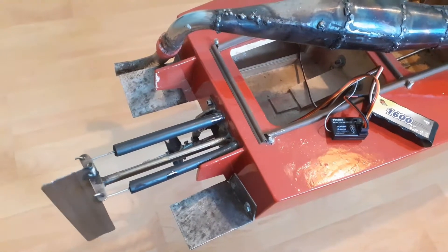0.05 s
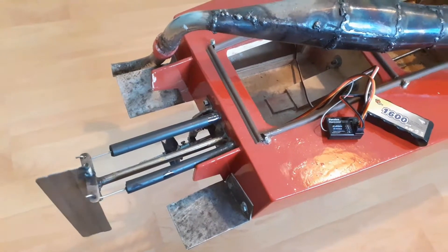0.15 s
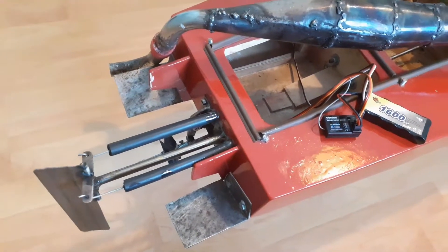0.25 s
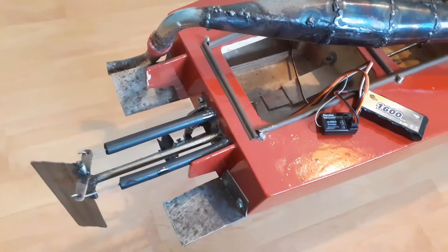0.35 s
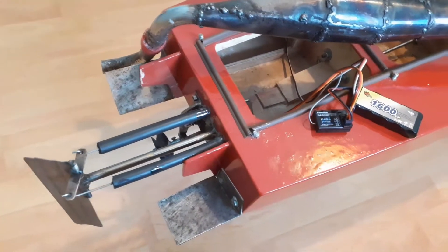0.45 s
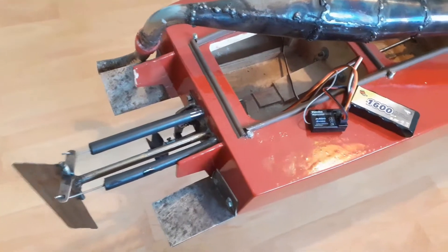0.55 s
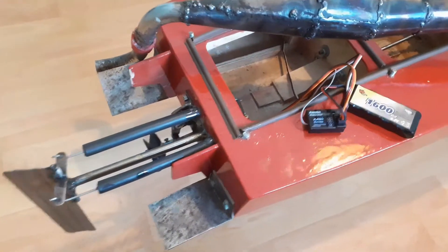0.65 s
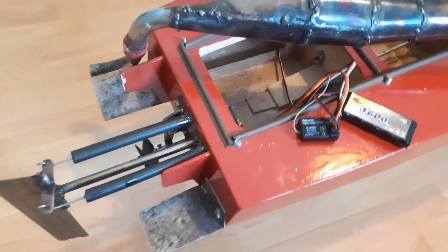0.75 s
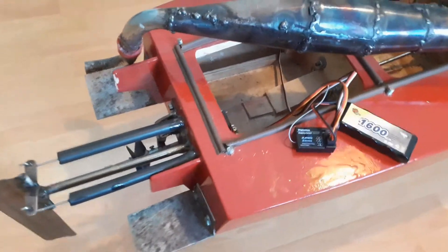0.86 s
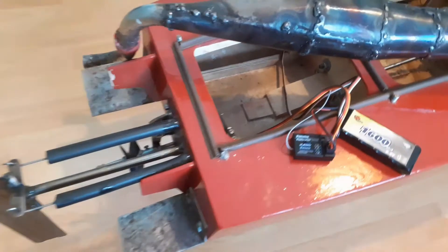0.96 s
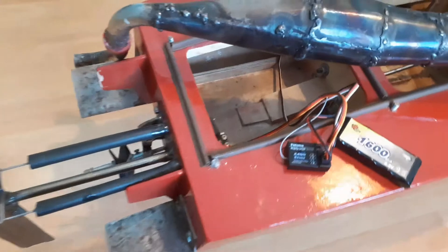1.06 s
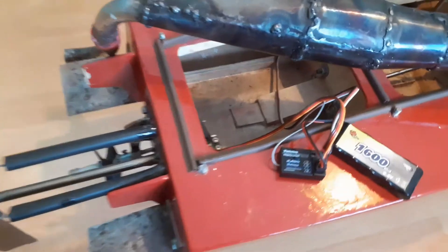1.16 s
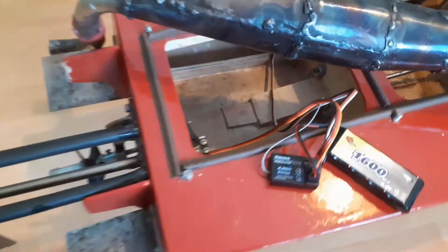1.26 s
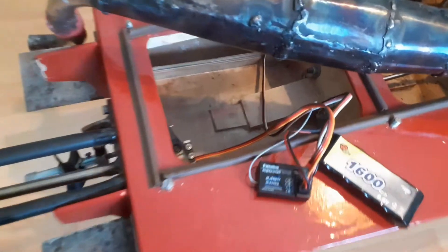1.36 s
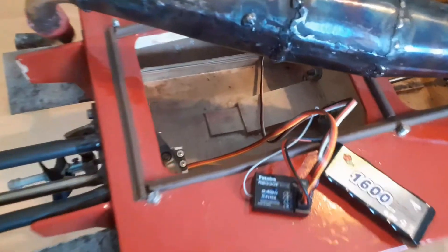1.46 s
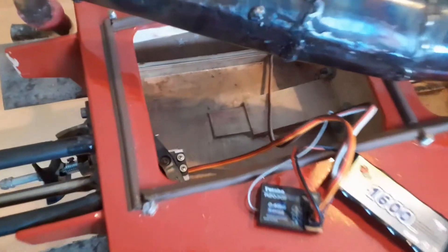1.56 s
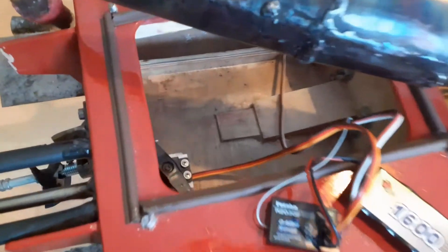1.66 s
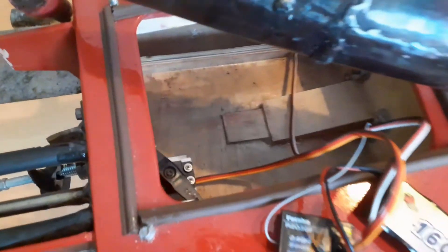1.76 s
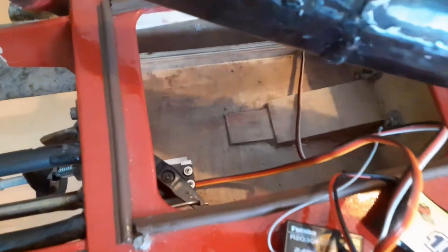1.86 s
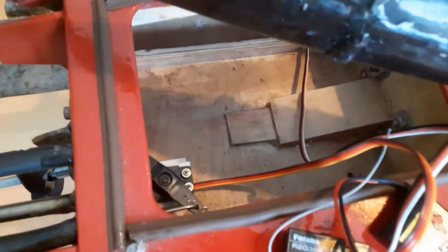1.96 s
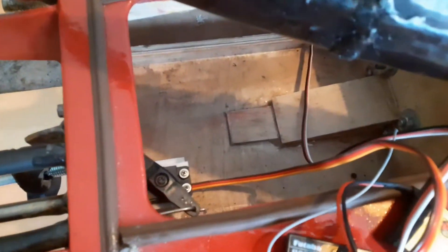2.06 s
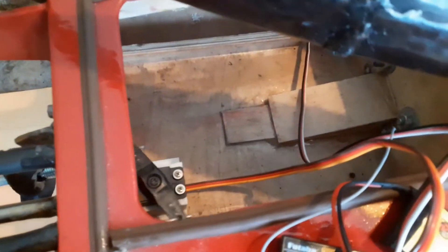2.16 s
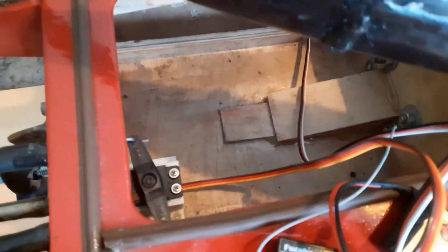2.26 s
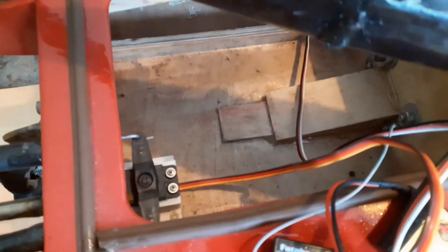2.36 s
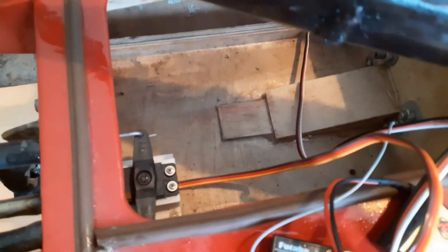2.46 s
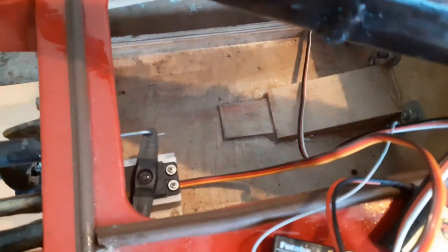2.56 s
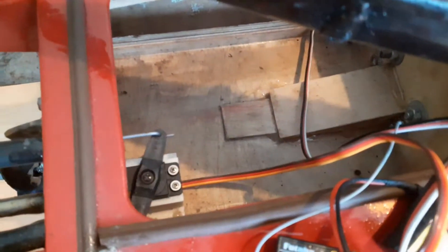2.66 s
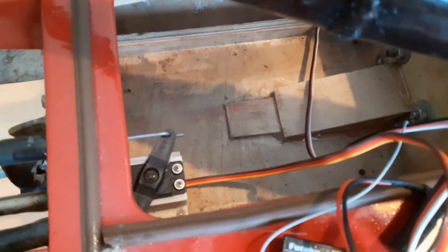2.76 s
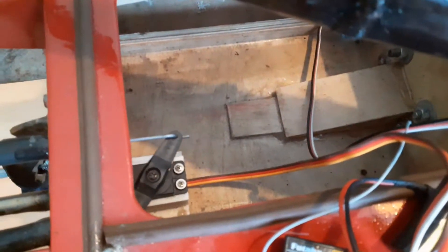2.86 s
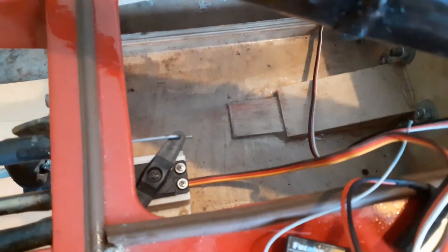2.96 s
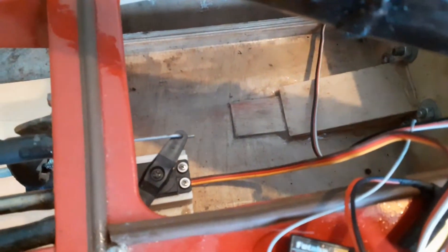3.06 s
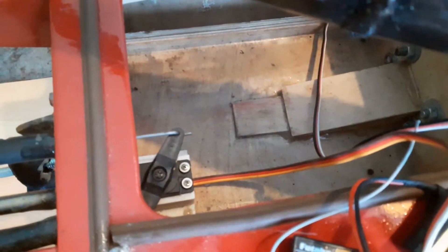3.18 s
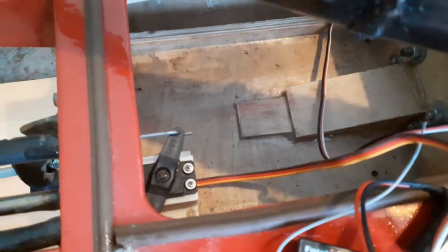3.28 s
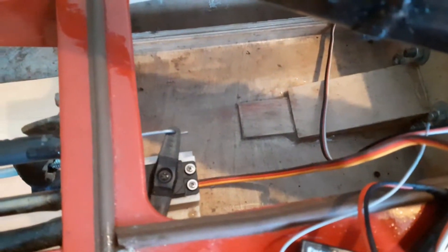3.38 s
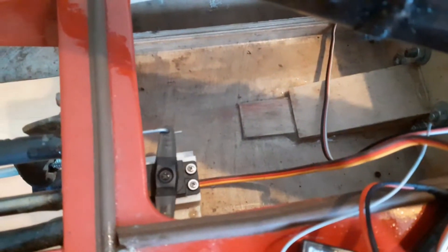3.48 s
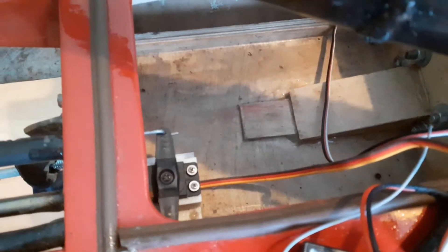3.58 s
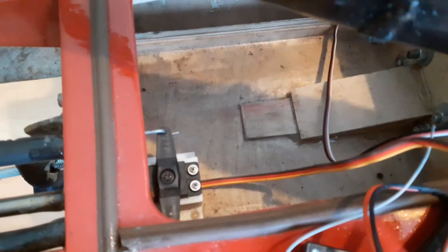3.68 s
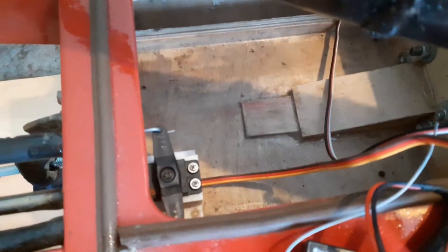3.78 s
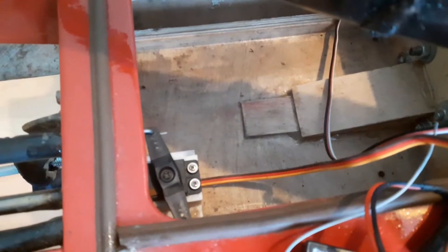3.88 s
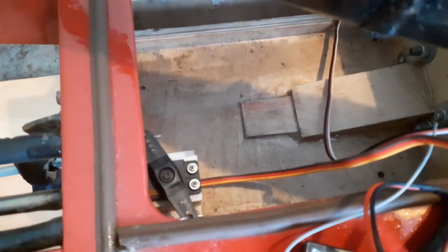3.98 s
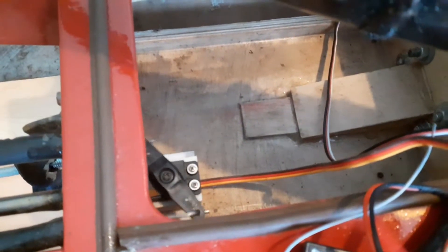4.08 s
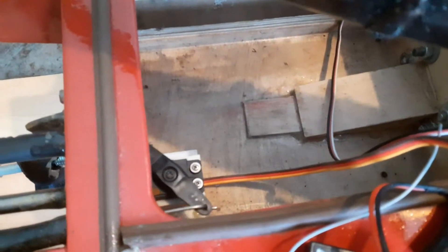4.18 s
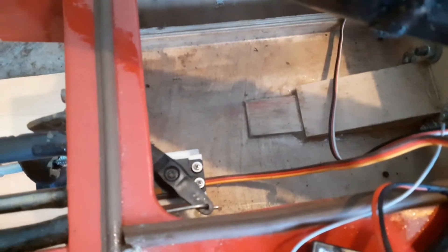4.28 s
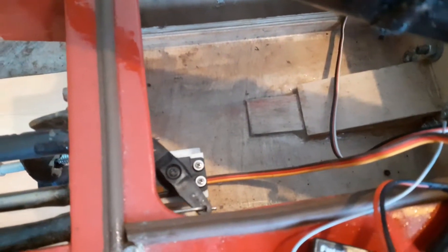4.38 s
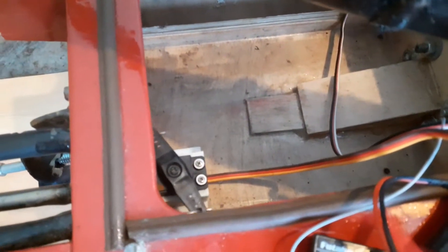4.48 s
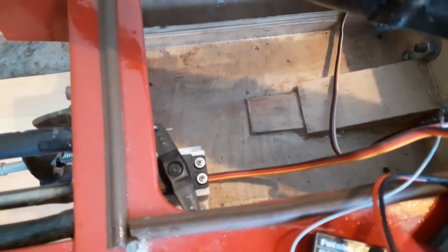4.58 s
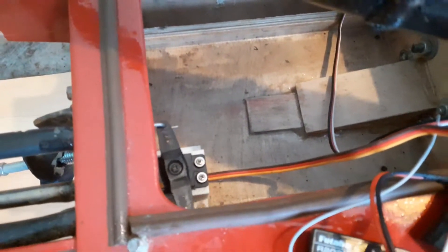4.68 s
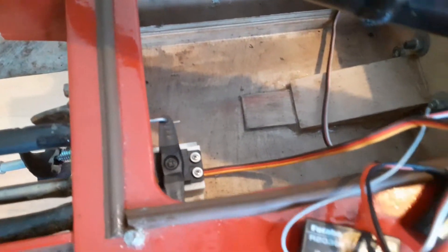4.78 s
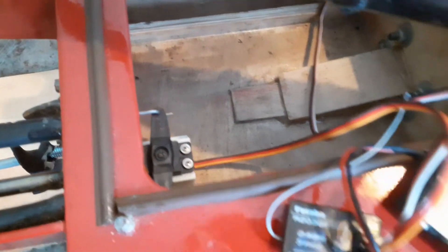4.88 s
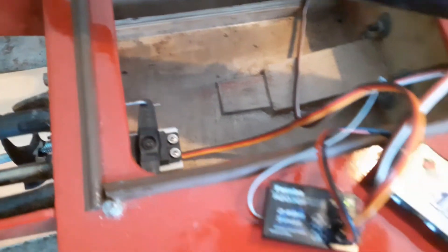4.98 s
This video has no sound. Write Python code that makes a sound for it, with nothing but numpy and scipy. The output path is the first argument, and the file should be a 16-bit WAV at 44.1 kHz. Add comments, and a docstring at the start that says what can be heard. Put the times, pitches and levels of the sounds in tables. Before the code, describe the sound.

Close stereo microphone over an open model hull indoors: a tiny geared motor buzzes, stops and buzzes again as it swings a push rod. It begins mid-whir, drops to weak, uneven bursts, then strengthens into sustained raspy strokes. High fizzing tooth clatter rides over papery panel rattle and faint hollow boom, with light ticks at starts, quick decay and barely audible still air.

```python
"""Model boat rudder servo

A small servo swings the rudder to and fro on an indoor workbench, heard from close by.
Gear slack closes with a tick at most stroke starts; loose teeth, as random impacts, clatter and ring
the servo case, push rod, hull panels and hollow hull. The linkage jolts the hull with soft knocks.
A small room lets every stroke die away quickly over faint still air."""
import sys
import numpy as np
from scipy import signal
from scipy.fft import rfft, irfft
from scipy.io import wavfile
from scipy.ndimage import uniform_filter1d, map_coordinates

SR = 44100
rng = np.random.default_rng(int(sys.argv[2]) if len(sys.argv) > 2 else 0)


def transcribe(u):
    """Save the signal u as a 16-bit wav file named by the first command-line argument.

    u: samples, shape (n,) or (channels, n), limited to [-1, 1]; the rate is SR.
    q: integer samples, one column per channel.
    """
    v = np.clip(np.atleast_2d(u).T, -1, 1)
    q = np.round(v * 32767).astype(np.int16)
    wavfile.write(sys.argv[1], SR, q)


N = 222040
T = np.arange(N) / SR

# listener leaning in over the open hull: t/s, left minus right/dB, case ring/dB
LISTENER = [(0, 2.5, -5), (.6, 3, -2), (1.05, 1.5, 1.5), (1.9, 2.5, 0.5), (2.65, 4, .5), (3.05, 2, 2.5),
            (3.5, 2.5, 0.5), (5.03, 2.5, 1)]
# hollow hull modes: f/Hz, width/Hz, level/dB, left minus right/dB
HULL_MODES = [(147.6, 30, -19.5, 4), (239.5, 20, -13.5, -2), (332, 16.3, -0.5, 0.5), (362, 26.5, -5, -1),
              (452.4, 27, -6, 2), (530, 48, -12, 11)]
# tooth click spectrum: f/Hz, relative density/dB
CLICK_SPECTRUM = [(2800, -28), (3500, -36.5), (4000, -6.5), (4600, -2), (6000, 0), (7300, 2.5), (8400, 0),
                  (9700, 0.5), (11500, 1.5), (13000, -2.5), (15800, -9)]


def undb(db):
    """Decibels to gain."""
    return 10 ** (np.asarray(db) / 20)


def unit(x):
    """Scale to rms 1."""
    return x / np.sqrt(np.mean(x ** 2))


def pan(db):
    """Left and right gains for a level difference, left minus right."""
    return undb(np.array([[.5], [-.5]]) * db)


def walk(rate_per_s):
    """Random levels, each held 1 / rate, smoothed by a moving mean as long; rms 1."""
    hold = max(int(SR / rate_per_s), 2)
    steps = np.repeat(rng.standard_normal(N // hold + 1), hold)
    return unit(uniform_filter1d(steps, hold)[:N])


def colour(x, points):
    """Minimum-phase filter through (f/Hz, level/dB) points, from the cepstrum of its log gain."""
    hz, db = np.transpose(points)
    size = 4096
    f = np.maximum(np.fft.rfftfreq(size, 1 / SR), 1)
    gain = undb(np.interp(np.log(f), np.log(hz), db))
    cepstrum = irfft(np.log(gain))
    # fold onto positive time: causal
    cepstrum[1:size // 2] *= 2
    cepstrum[size // 2 + 1:] = 0
    response = irfft(np.exp(rfft(cepstrum)))
    return signal.fftconvolve(x, response[None], axes=1)[:, :N]


def ring(x, hz, width_hz):
    """One resonance, gain 1 at its centre."""
    return signal.lfilter(*signal.iirpeak(hz, hz / width_hz, fs=SR), x + 1e-18)  # offset: no denormals


def impacts(rate_per_s, scatter_db):
    """Irregular tooth impacts, on either flank and of uneven strength; mean power 1."""
    hit = rng.random(N) < rate_per_s / SR
    flank = rng.choice([-1, 1], N)
    size = unit(undb(scatter_db * rng.standard_normal(N)))
    return hit * flank * size * np.sqrt(SR / rate_per_s)


def body(modes, rate_per_s, scatter_db, flicker_db, flicker_per_s):
    """Impacts ring a set of modes; the contact point wanders, so each mode swells and fades alone."""
    out = 0
    for hz, width_hz, db, side_db in modes:
        tone = ring(impacts(rate_per_s, scatter_db), hz, width_hz)
        tone = ring(tone, hz, min(5 * width_hz, hz))  # trims the skirts
        flickering = unit(tone * undb(flicker_db * walk(flicker_per_s)))
        out = out + flickering * undb(db) * pan(side_db)
    return unit(out)


def hull_echoes(x, spread, longest_s, count):
    """Reflections off the hull walls, others for each ear; their comb shifts as the listener moves."""
    # echo path: t/s, relative length
    echo_path = [(0, 1.18), (1.2, 1.15), (2.2, 1.0), (5.03, 1.093)]
    path = np.interp(T, *np.transpose(echo_path))
    high_pass = signal.butter(2, 450, "high", fs=SR, output="sos")
    short_waves = signal.sosfilt(high_pass, x)  # long waves bend round the walls
    out = np.array([x, x])
    for ear in out:
        for lag_s in rng.uniform(0.09995, 1, count) * longest_s:
            late = map_coordinates(short_waves, [np.arange(N) - lag_s * path * SR], order=3)
            ear += spread * rng.choice([-1, 1]) * late / np.sqrt(count)
    return out


def clatter(points, rate_per_s, scatter_db, spread, longest_s):
    """Dry tooth clicks with their echoes inside the hull."""
    echoed = hull_echoes(impacts(rate_per_s, scatter_db), spread, longest_s, count=7)
    return unit(colour(echoed, points))


def drive():
    """Gear, hull, panel and grit gains: the motor spins up, wavers, swells, dips and coasts to rest."""
    # motor effort, one curve per rudder stroke: t/s, gear level/dB
    effort = [
        [(0.0, -41.5), (0.138, -32), (0.252, -41), (0.27, -37), (0.446, -43), (0.458, -41), (0.492, -48),
         (0.508, -44.5), (0.53, -48)],
        [(0.62, -52.5), (0.632, -45), (0.674, -40.5), (0.712, -45.5), (0.81, -48.5), (0.832, -55.5),
         (0.856, -46), (0.932, -62.5), (0.97, -59)],
        [(1.0, -55), (1.016, -47), (1.044, -42), (1.068, -47), (1.09, -46), (1.125, -53)],
        [(1.23, -57.5), (1.238, -50.5), (1.284, -47.5), (1.298, -54), (1.338, -51.5), (1.354, -43),
         (1.464, -51.5), (1.498, -45.5), (1.55, -58)],
        [(1.58, -52), (1.602, -58), (1.716, -43.5), (1.752, -52.5), (1.77, -40.5), (1.862, -42.5), (1.872, -37),
         (1.962, -38.5), (1.97, -42.5)],
        [(2.212, -42), (2.236, -35), (2.34, -31), (2.502, -33.5), (2.52, -44.5)],
        [(2.535, -42), (2.603, -37), (2.609, -31.5), (2.843, -34.5), (2.855, -41), (2.877, -32), (2.995, -40),
         (3.013, -31.5), (3.025, -42.5)],
        [(3.218, -41), (3.23, -34), (3.376, -45.5), (3.384, -40), (3.434, -40.5), (3.448, -34.5), (3.602, -34),
         (3.62, -29), (3.635, -36.5)],
        [(3.825, -45.5), (3.841, -40), (3.889, -39), (3.915, -31.5), (3.947, -37), (4.157, -36.5), (4.173, -30),
         (4.253, -32.5), (4.265, -40)],
        [(4.42, -45), (4.432, -40.5), (4.694, -33.5), (4.726, -39.5), (4.776, -32.5), (4.858, -32),
         (4.878, -44), (4.924, -40), (5.02, -56)],
    ]
    # load per stroke: gear/dB, then relative to gear: hull boom/dB, panel rattle/dB, grit/dB
    loads = [(3, -19, -10, -6.5), (3, -15, -8.5, -6), (1.5, -18, -9.5, -9.5), (2, -16, -10, -8),
             (2.5, -13.5, -11, -8.5), (3, -15, -11.5, -7.5), (1.5, -14.5, -13, -12),
             (2.5, -14.5, -10.5, -9.5), (2.5, -16.5, -10, -9), (2, -14.5, -11.5, -9.5)]
    # brief swells and dips of the whir: t/s, gain/dB
    swells = [(.31, 2), (0.334, -2.5), (0.366, 5.5), (1.92, -3), (1.95, 1.5), (2.436, 1), (2.74, 6),
              (2.795, -1.5), (3.55, 2.5), (4.01, 1), (4.07, 3), (4.107, -3.5), (4.127, 3.5), (4.564, 3.5),
              (4.607, -3.5)]
    usual_db = -38  # ordinary effort
    growth = np.array([[1], [0.71], [1], [1.38]])  # dB per dB of effort: hard driving sounds brighter
    swell_s = 0.0086  # 1/e half length
    lead_s, spin_up_s, coast_s = 0.0049, 0.0039, 0.03  # motor leads the load; time constants
    swell_db = 0.5 * walk(22)  # the motor hunts a little
    for s, db in swells:
        swell_db = swell_db + db * np.exp(-((T - s) / swell_s) ** 2)
    gains = np.zeros((4, N))
    for stroke, (gear_db, *relative_db) in zip(effort, loads):
        s, db = np.transpose(stroke)
        spin_up = 1 - np.exp(-np.maximum(T - s[0] + lead_s, 0) / spin_up_s)
        coast = np.exp(-np.maximum(T - s[-1], 0) / coast_s)
        effort_db = np.interp(T, s, db) + swell_db - usual_db
        base_db = usual_db + gear_db + np.array([0] + relative_db)[:, None]
        gains = np.maximum(gains, spin_up * coast * undb(base_db + growth * effort_db))
    return gains


def gear_teeth(rate_per_s):
    """Tooth impacts ring the servo case and push rod, over dry clicks."""
    # servo case modes: f/Hz, width/Hz, level/dB, left minus right/dB
    case_modes = [(4324, 27, -14.5, -17.5), (4700, 180, -21, 38), (5250, 85, -25, -29),
                  (6663, 125, -7.5, 29.5), (6940, 80, -3, 12), (7027, 37, 0, 1), (7060, 220, -4, 1),
                  (7290, 33, -1, 9.5), (7340, 69, -8.5, 3), (7888, 16, -2, -9), (8084, 69, 3, 2.5),
                  (8280, 270, 0, 3), (8400, 30, -27, 4), (8500, 35, -1.5, 10.5), (9090, 17, -3, 1),
                  (11070, 51, -6.5, -1), (11700, 30, -4, -4), (13200, 90, -3, -1), (14100, 140, -17, -10)]
    # push rod modes, heard from above the stern: f/Hz, width/Hz, level/dB, left minus right/dB
    rod_modes = [(7680, 91, -2.5, 2), (8360, 90, -0.5, 0)]
    # rod as the listener leaves the stern: t/s, level/dB
    rod_level = [(0, -10), (.9, -8.5), (2.2, -21)]
    s, _, case_db = np.transpose(LISTENER)
    case = body(case_modes, rate_per_s, scatter_db=1, flicker_db=2, flicker_per_s=55)
    case *= undb(np.interp(T, s, case_db))
    clicks = clatter(CLICK_SPECTRUM, rate_per_s, scatter_db=2.5, spread=1, longest_s=.008)
    clicks *= undb(2.33 * walk(80))
    rod = body(rod_modes, rate_per_s, scatter_db=7, flicker_db=3, flicker_per_s=20)
    rod *= undb(np.interp(T, *np.transpose(rod_level)))
    return undb(-3.5) * case + undb(-4) * clicks + rod


def hull_panels(rate_per_s):
    """Hull panels ring and rattle under the tooth impacts."""
    # panel modes: f/Hz, width/Hz, level/dB, left minus right/dB
    panel_modes = [(1384, 46, -3, -6), (1594, 144, -3.5, 10.5), (2180, 120, -1.5, 6.5), (2417, 68, 2, 5.5),
                   (2671, 116, 2.5, 5)]
    # rattle spectrum: f/Hz, relative density/dB
    rattle_spectrum = [(30, -31), (80, -7.5), (200, -8.5), (400, 3), (650, -1.5), (800, -2.5), (1400, 0),
                       (1900, -3.5), (2750, 4), (3080, -10), (4000, -5.5), (8000, -49)]
    panels = body(panel_modes, rate_per_s, scatter_db=1.5, flicker_db=5, flicker_per_s=50)
    panels[1] = np.interp(T - .0003, T, panels[1])  # side panel lies nearer the left ear
    rattle = clatter(rattle_spectrum, .5 * rate_per_s, scatter_db=2.5, spread=2.3, longest_s=.02)
    return undb(-2.5) * panels + undb(-1.5) * rattle


def servo():
    """The gear train whirs: teeth strike faster when driven harder, and the load flutters."""
    gear, hull, panel, grit = drive()
    rate_per_s = 3000 + 8000 * np.sqrt(gear / gear.max())
    flutter = undb(.5 * walk(70) + 0.64 * walk(260))
    teeth = gear_teeth(rate_per_s)
    grit_hz = 9850  # hardest tooth contacts sound above this
    high_pass = signal.butter(4, grit_hz, "high", fs=SR, output="sos")
    sharp = signal.sosfiltfilt(high_pass, teeth)
    whir = gear * (teeth - sharp) + grit * undb(-1.9) * unit(sharp)
    rasp = panel * hull_panels(rate_per_s)
    boom = body(HULL_MODES, 0.22 * rate_per_s, scatter_db=4, flicker_db=0.64, flicker_per_s=31)
    return flutter * (whir + rasp) + hull * undb(-1.5) * boom


def still_air():
    """Faint steady coloured noise of the still room, partly shared by the ears."""
    # still room spectrum: f/Hz, relative density/dB
    air_spectrum = [(25, -18), (100, -2), (330, -3), (800, -8.5), (1250, -3), (2500, -12), (6000, -11.5),
                    (9000, -18), (15000, -13)]
    noise = rng.standard_normal(N) + 1.2 * rng.standard_normal((2, N))
    return undb(-67.5) * unit(colour(noise, air_spectrum))


def blow(start_s, decay_s):
    """Envelope of one contact: instant rise, exponential fall."""
    return (T >= start_s) * np.exp(-np.maximum(T - start_s, 0) / decay_s)


def linkage():
    """Noise ticks as gear slack closes, and soft push rod jolts that boom in the hull modes."""
    # gear slack closing: t/s, tick/dB, hull knock relative to tick/dB
    slack_ticks = [(.612, -47, -12), (1.007, -49, -27), (1.225, -73, -6.5), (1.757, -54, -11),
                   (2.196, -47, -6.5), (3.204, -42, -30), (3.791, -54, 10.5), (3.803, -52, -17),
                   (4.406, -49, -11)]
    # linkage jolting the hull: t/s, level/dB
    hull_jolts = [(1.08, -45), (1.415, -42), (1.495, -46.5), (2.73, -34), (3.29, -36), (4.555, -47)]
    noise = rng.standard_normal(N) + .5 * rng.standard_normal((2, N))
    snap = unit(colour(noise, CLICK_SPECTRUM))
    ticks = sum(undb(db) * blow(s, 0.0068) for s, db, _ in slack_ticks)
    knocks = [(s, db + knock_db) for s, db, knock_db in slack_ticks] + list(hull_jolts)
    pushes = np.zeros(N)
    for s, db in knocks:
        pushes[int(s * SR)] += undb(db)
    t = T[:SR // 4]
    hollow = np.zeros(len(t))
    for hz, width_hz, db, _ in HULL_MODES:
        hollow += undb(db) * np.exp(-np.pi * width_hz * t) * np.sin(2 * np.pi * hz * t)
    push_s = 0.005  # a soft push builds up gradually
    hollow *= 1 - np.exp(-(t / push_s) ** 2)
    return ticks * snap + undb(2) * signal.fftconvolve(pushes, hollow)[:N]


def room(x, wet_db, delay_s):
    """Dense reflections from bench and walls, different at each ear; each band fades at its own rate."""
    # room bands: f/Hz, time to fall 60 dB/s, relative level/dB
    room_bands = [(200, 0.29, 3.5), (960, 0.31, 2), (4200, 0.02, 8.5), (7860, 0.18, -6.5),
                  (15000, 0.06, -3)]
    t = T[:SR // 2]
    noise = rfft(rng.standard_normal((2, len(t))))
    log_f = np.log(np.maximum(np.fft.rfftfreq(len(t), 1 / SR), 1))
    hz, t60_s, level_db = np.transpose(room_bands)
    tail = 0
    for share, fall_s, db in zip(np.eye(len(hz)), t60_s, level_db):
        band = irfft(noise * np.interp(log_f, np.log(hz), share), len(t))
        fall = np.exp(-np.log(1000) * t / fall_s)
        tail = tail + band * undb(db) * fall * (t > delay_s)
    tail = tail / np.sqrt(np.sum(tail ** 2) / 2)  # mean energy 1 per ear
    return x + undb(wet_db) * signal.fftconvolve(x, tail, axes=1)[:, :N]


def scene():
    """Servo and linkage, panned as the listener moves, in a quiet room."""
    s, side_db, _ = np.transpose(LISTENER)
    machine = (servo() + linkage()) * pan(np.interp(T, s, side_db) - 1.7)
    return room(machine, wet_db=-14, delay_s=0.00433) + still_air()


def record(dry):
    """A steep elliptic low-pass cuts the top."""
    top_hz = 15800
    return signal.sosfilt(signal.ellip(10, .2, 70, top_hz, fs=SR, output="sos"), dry)


dry = scene()
out = record(dry)
transcribe(out)
```